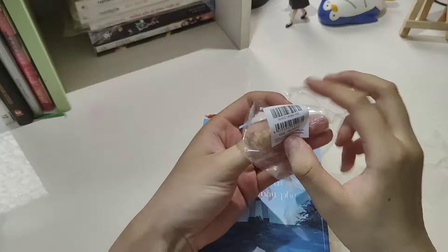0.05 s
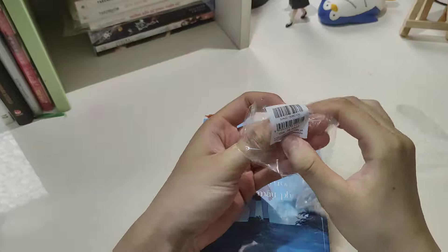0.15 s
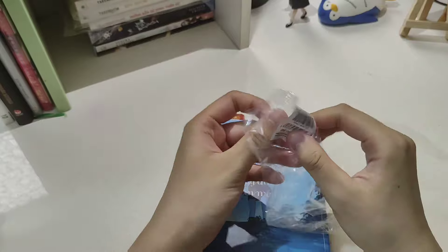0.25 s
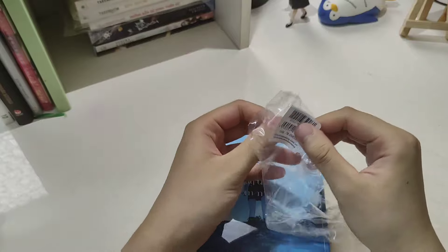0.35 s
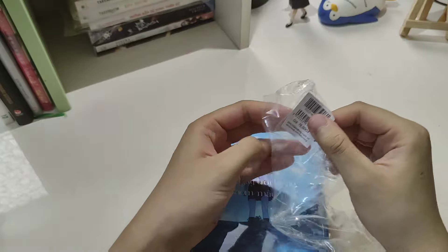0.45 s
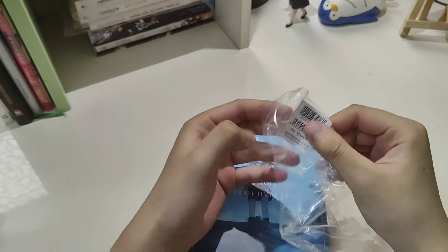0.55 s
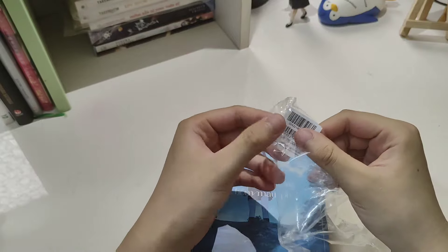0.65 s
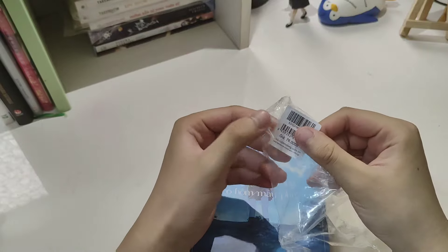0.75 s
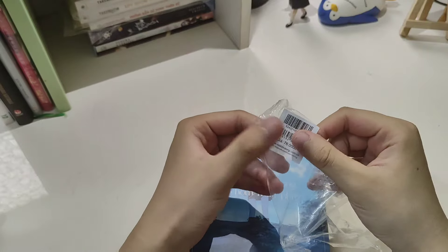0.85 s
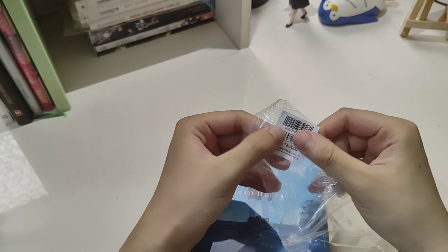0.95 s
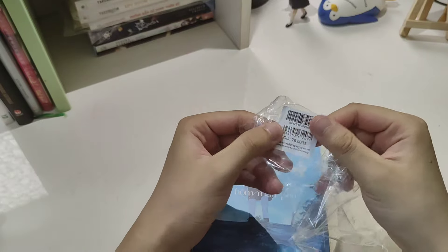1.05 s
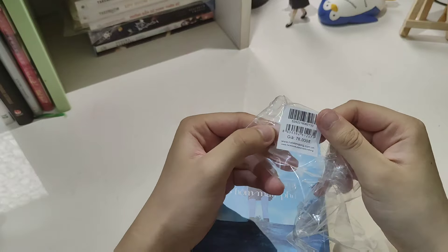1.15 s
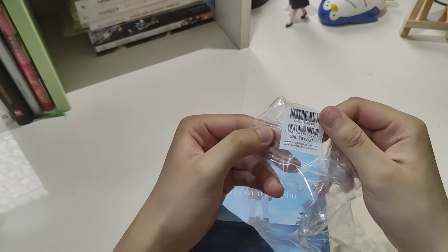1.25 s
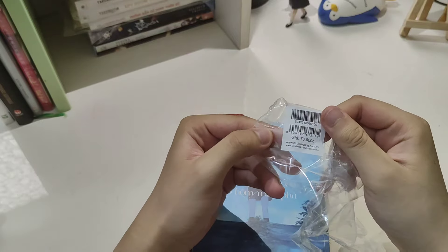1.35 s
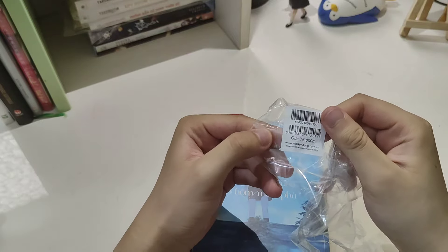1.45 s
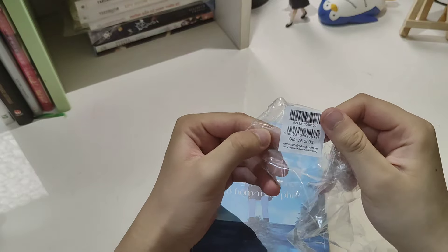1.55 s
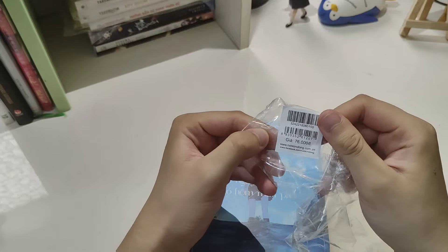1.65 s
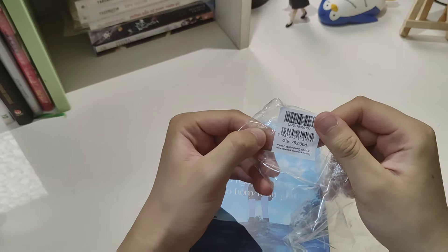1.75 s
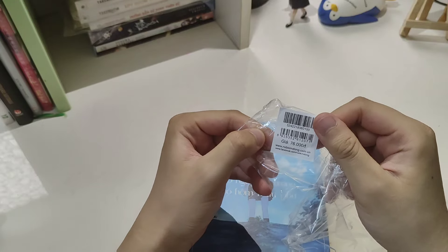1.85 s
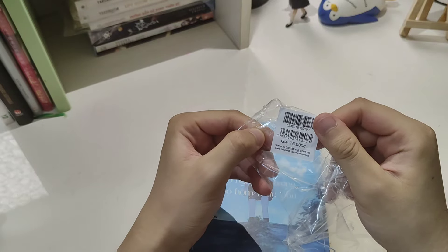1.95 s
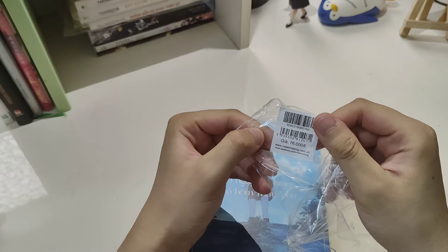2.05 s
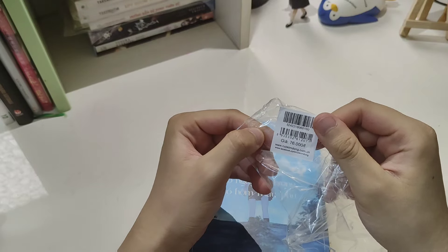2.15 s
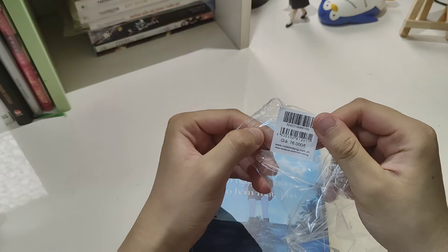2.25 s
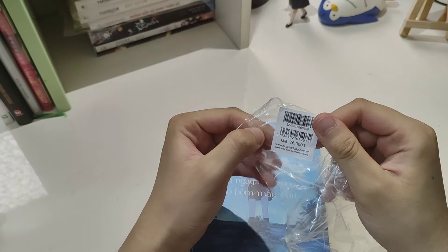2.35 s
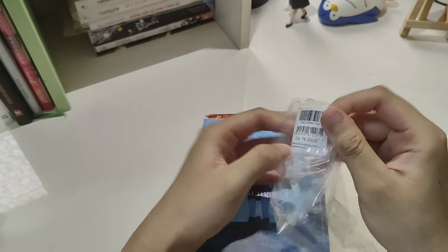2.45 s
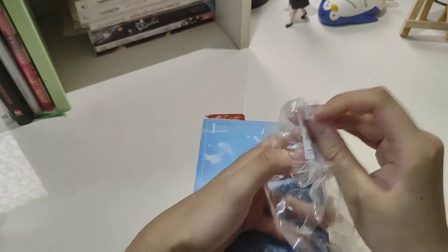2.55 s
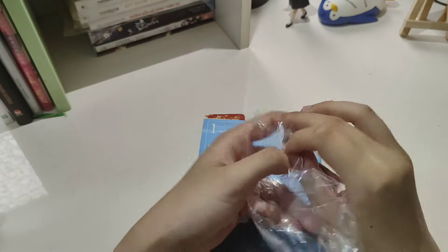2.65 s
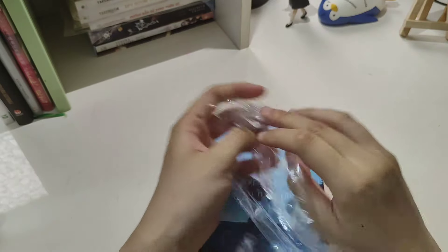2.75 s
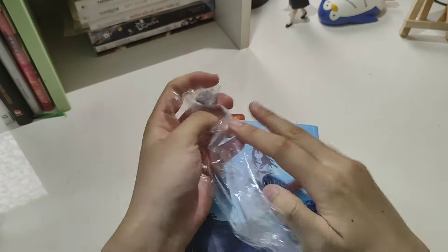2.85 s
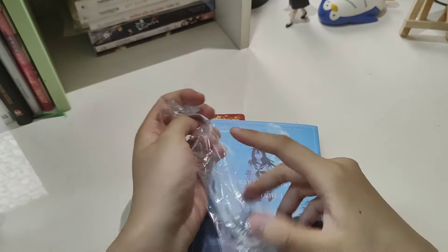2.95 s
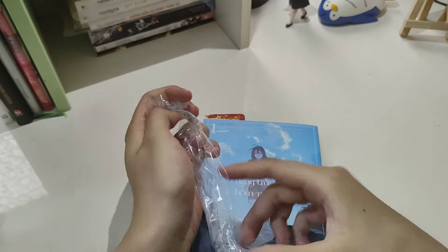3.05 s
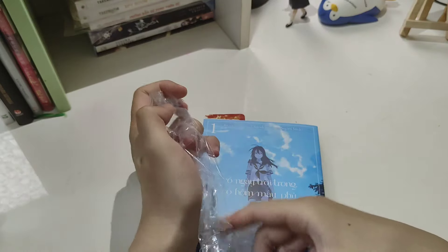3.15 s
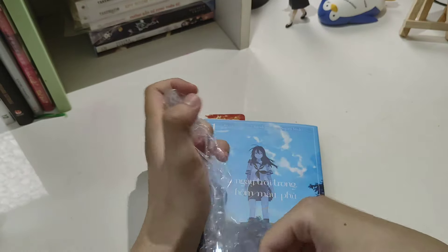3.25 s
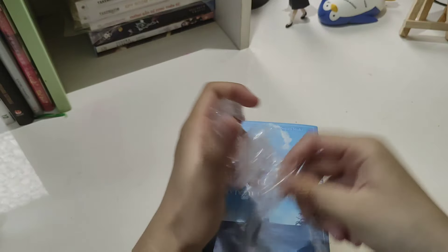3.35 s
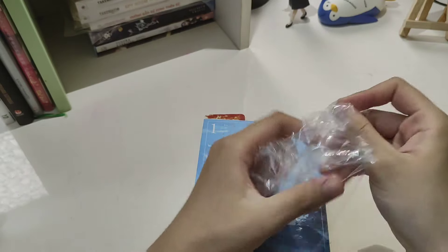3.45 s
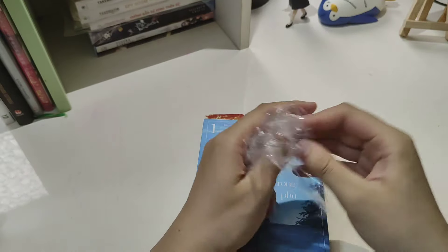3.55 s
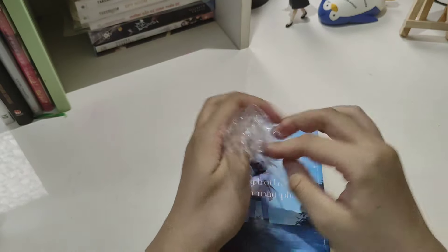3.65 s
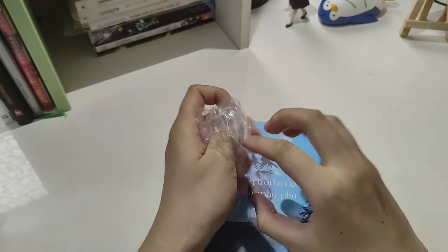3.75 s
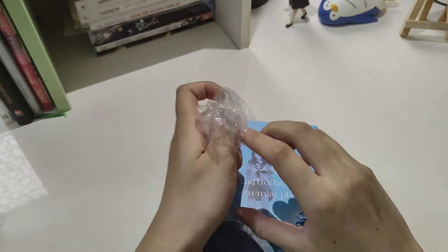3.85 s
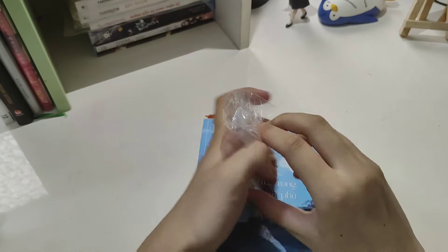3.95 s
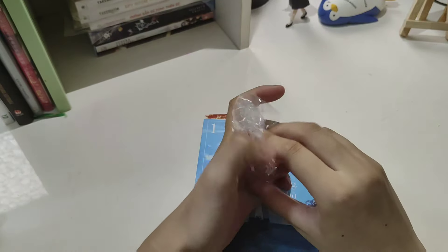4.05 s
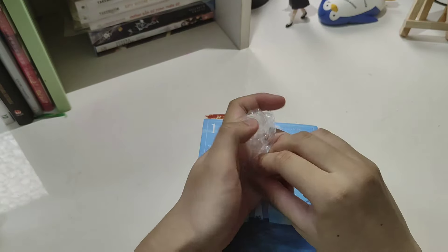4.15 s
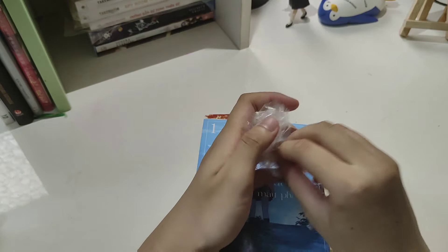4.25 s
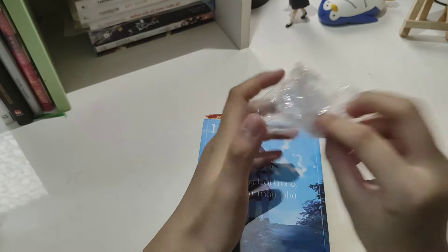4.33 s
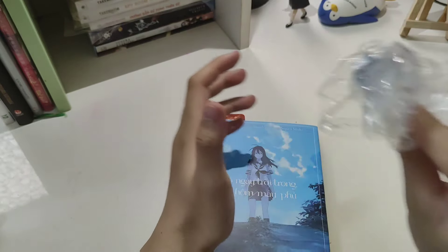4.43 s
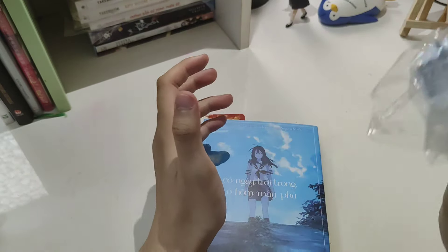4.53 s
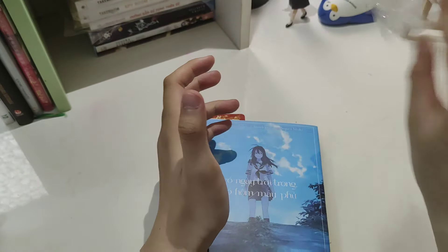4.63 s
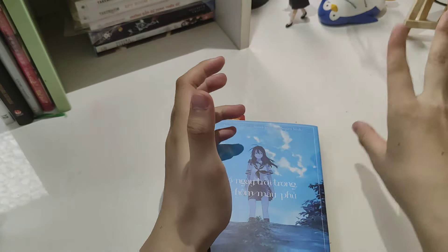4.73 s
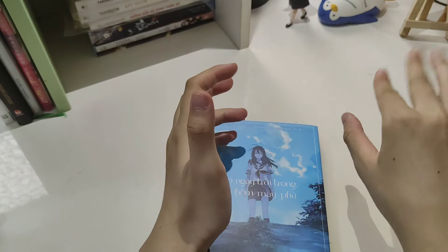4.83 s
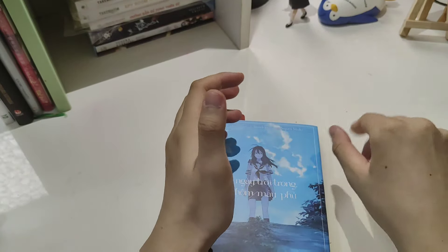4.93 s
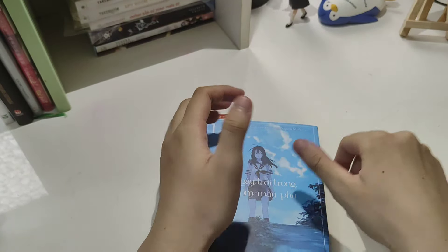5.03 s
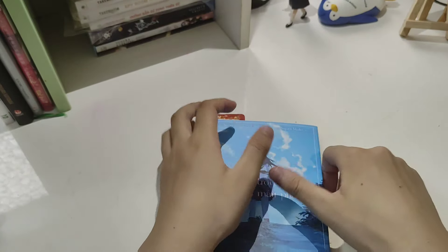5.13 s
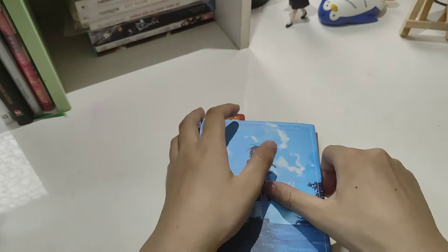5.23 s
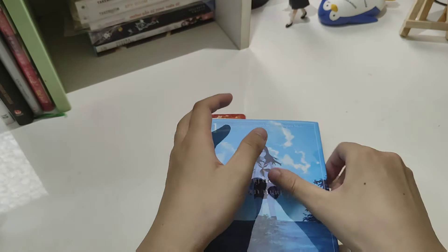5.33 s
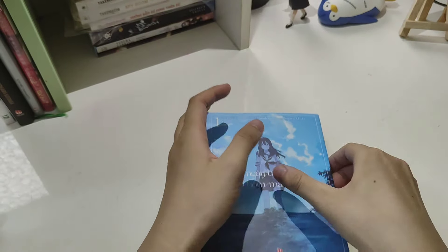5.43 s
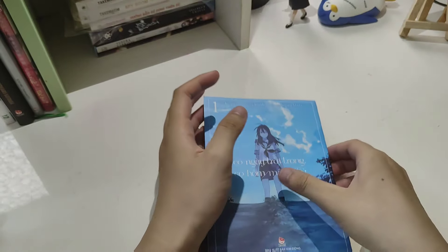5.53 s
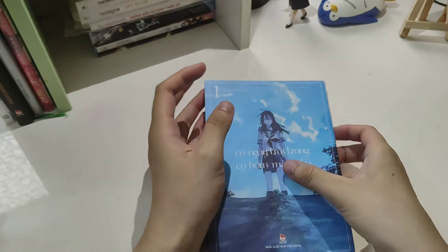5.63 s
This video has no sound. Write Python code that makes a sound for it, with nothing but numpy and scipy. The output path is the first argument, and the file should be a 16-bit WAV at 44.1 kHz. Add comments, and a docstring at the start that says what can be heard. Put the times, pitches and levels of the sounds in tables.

```python
"""At a desk in a quiet room, close to a small microphone: two hands pick at a sheet of clear plastic film,
crumple it into a ball and toss it aside. Its creases buckle in swarms of clicks that ring the film's modes,
and squeezed air pockets sound as puffs of noise in narrow resonances. Fingers settle on a book as slips that
ring its cover; a wrist bumps the desk as rounded pushes that ring its top.
Behind lie a low hum of resonant noise and room tone of coloured noise."""
import sys
import numpy as np
from scipy import signal
from scipy.fft import rfft, irfft
from scipy.io import wavfile

SR = 44100
rng = np.random.default_rng(int(sys.argv[2]) if len(sys.argv) > 2 else 0)


def to_linear_factor(level_db):
    """Convert decibel levels (scalar or array-like) to linear amplitude factors."""
    exponent = np.asarray(level_db, float) / 20
    return 10 ** exponent


def dump_mix(stems):
    """Bounce the given channels to the path in sys.argv[1] as a 16-bit WAV at rate SR."""
    frames = np.atleast_2d(stems).T  # one column per channel
    limited = np.clip(frames, -1, 1)  # hard clip at full scale
    pcm = np.round(limited * 32767).astype(np.int16)
    wavfile.write(sys.argv[1], SR, pcm)


N = 250929   # length [samples]

# single creases that snap, close by:
# start t/s, peak level/dB, favoured pitch f/Hz, bright sheen against the peak level/dB, dying time t60/s
SNAPS = [(0.0732, -21, 2807, -10.5, 0.06), (0.1047, -18, 2300, -16.5, 0.06), (0.1324, -23, 2420, -9, 0.06),
         (0.156, -21, 2430, -12, 0.06), (0.178, -27, 2384, -13, 0.069), (0.2409, -18, 2405, -21, 0.056),
         (0.2544, -29.5, 2585, -15.5, 0.06), (0.3287, -26, 4290, -8, 0.06),
         (0.3556, -26, 4260, -10.5, 0.06), (0.397, -21.5, 5030, -9, 0.06), (0.4259, -17, 4730, -10, 0.06),
         (0.4534, -23, 4340, -10, 0.06), (0.4864, -23, 4320, -13.5, 0.06), (0.5053, -19.5, 2650, -15, 0.06),
         (0.5646, -19, 4250, -8, 0.12), (0.6858, -46, 2900, -9, 0.06), (0.7134, -42, 2640, -11, 0.06),
         (0.7377, -37.5, 5630, -11.5, 0.06), (0.824, -53, 2710, -8, 0.06), (0.8734, -47, 2620, -16, 0.06),
         (0.8969, -37, 2730, -15.5, 0.081), (0.9453, -50.5, 2460, -5, 0.06),
         (0.9832, -35.5, 2570, -19.5, 0.076), (0.9957, -39.5, 2630, -24.5, 0.053),
         (1.0251, -47.5, 2610, -18, 0.052), (1.1313, -56.5, 2640, -21, 0.052),
         (1.2087, -30.5, 4850, -17.5, 0.13), (1.2364, -36.5, 4870, -13, 0.065),
         (1.2514, -41.5, 4570, -16.5, 0.069), (1.29, -40.5, 4460, -22.5, 0.11),
         (1.3294, -53, 2380, -17, 0.071), (1.4097, -50, 2660, -6, 0.048), (1.9036, -56, 5560, -8, 0.055),
         (1.93, -51, 5190, -7, 0.06), (2.6618, -26.5, 2670, -10, 0.06), (2.6798, -20, 2710, -13, 0.06),
         (2.7018, -10.5, 2850, -14.5, 0.06), (2.7686, -15.5, 2570, -8.5, 0.06),
         (2.7994, -15.5, 4890, -9.5, 0.06), (2.8285, -10.5, 2680, -12.5, 0.06),
         (2.8409, -12, 2610, -9.5, 0.06), (2.8629, -11, 3467, -12.5, 0.069),
         (2.9238, -12, 5090, -12, 0.052), (2.9334, -10, 2170, -10.5, 0.06),
         (2.9564, -14.5, 2450, -11, 0.06), (2.9851, -11, 2700, -11, 0.06), (3.0106, -10.5, 2760, -6, 0.06),
         (3.0404, -16.5, 5300, -7.5, 0.06), (3.0849, -22, 2780, -9, 0.06), (3.1234, -26.5, 2400, -18, 0.06),
         (3.1704, -25.5, 2820, -15.5, 0.06), (3.1807, -23.5, 2740, -15, 0.07),
         (3.2054, -20, 3480, -10.5, 0.065), (3.244, -19, 3150, -9, 0.06), (3.267, -21.5, 3200, -12, 0.071),
         (3.3069, -18.5, 2280, -14.5, 0.06), (3.3254, -26, 2350, -10, 0.06),
         (3.3418, -17.5, 2630, -8.5, 0.075), (3.3922, -13, 4420, -7.5, 0.06), (3.4451, -16, 4200, -8, 0.06),
         (3.4624, -20, 3090, -13, 0.06), (3.5344, -19.5, 2700, -11, 0.06), (3.5568, -22.5, 2690, -11, 0.06),
         (3.5884, -16.5, 2140, -11, 0.06), (3.6546, -16, 2690, -12.5, 0.06),
         (3.7274, -10, 2760, -13.5, 0.06), (3.7604, -9.5, 4910, -12.5, 0.06),
         (3.7844, -11.5, 2700, -14, 0.06), (3.8164, -11.5, 2720, -12, 0.06), (3.8274, -10, 4800, -15, 0.06),
         (3.8704, -13, 4350, -9.5, 0.06), (3.8944, -13, 2750, -9, 0.06), (3.9414, -12.5, 4780, -13.5, 0.06),
         (3.9978, -13.5, 4720, -11.5, 0.06), (4.0731, -12.5, 4740, -10, 0.06),
         (4.1044, -10.5, 2340, -13, 0.06), (4.1424, -11.5, 2340, -13, 0.06),
         (4.1999, -13, 2790, -15.5, 0.06), (4.2694, -23, 4840, -9.5, 0.06),
         (4.3036, -17.5, 2640, -11, 0.06), (4.3164, -14.5, 2640, -13, 0.06), (4.3544, -13, 5010, -13, 0.06),
         (4.4324, -14.5, 2675, -17, 0.06), (4.4493, -11.5, 2660, -15.5, 0.06),
         (4.5234, -13.5, 2470, -16, 0.063), (4.5604, -19, 2670, -13.5, 0.097),
         (4.6174, -40, 2650, -19, 0.06), (4.6962, -53.5, 5070, -12, 0.06),
         (4.7102, -48.5, 5000, -21.5, 0.06), (4.7304, -50, 5000, -17.5, 0.06),
         (4.8249, -41.5, 5150, -12, 0.06), (4.8389, -39, 5000, -10, 0.06), (4.8564, -30, 5260, -8, 0.078),
         (4.9254, -43, 4780, -9, 0.06), (4.9914, -55, 2660, -7, 0.06), (5.0804, -38.5, 4440, -13.5, 0.064),
         (5.1284, -55, 2600, -10, 0.06), (5.3532, -47, 1915, -12, 0.06)]
# ringing modes of the film, one list a voice (slack belly, low, middle, bright):
# f/Hz, t60 of one resonator pass t/s, relative level/dB
FILM_MODES = [
    [(450, 0.003, -0.5), (683, 0.011, -3), (854, 0.0075, 1.5), (1190, 0.014, 0.5), (1350, 0.0051, 1),
     (1810, 0.0061, -8)],
    [(1950, .006, -6.5), (2150, .006, -3.5), (2400, .007, -3), (2660, .008, 0), (2900, .007, -4),
     (3200, .006, -6), (3500, .005, -5)],
    [(3850, .005, -3.5), (4200, .005, -4), (4450, .007, -2), (4750, .006, -2), (5050, .007, 0),
     (5450, .005, -3)],
    [(5960, 0.0009, -3.5), (7170, 0.0016, -1), (8230, 0.0015, -4.5), (8980, 0.0017, -2.5),
     (9800, .0013, -1), (11170, .0013, 1.5), (12260, 0.0013, 2.5), (12400, 0.0029, -4.5),
     (13260, 0.0012, 8.5), (14100, 0.0024, 0.5)],
]


def film():
    """One stream of buckles drives all modes of the film, each with strengths of its own."""
    rustle_db = rustle_levels()
    busy = np.clip(to_linear_factor(rustle_db[3] + 65.5), .1, 1)   # barely moved film gives lone ticks
    buckles = clicks(2300 * busy, spread_db=2.6) * to_linear_factor(1.7 * drift(36)) / np.sqrt(busy)
    fine = clicks(9000, spread_db=2.0)
    shapes = swarm_shapes(rise_s=0.0018, sharp_share=0.96)
    return sum(film_voice(k, rustle_db[k], buckles, fine, shapes) for k in range(len(FILM_MODES)))


def film_voice(k, rustle_db, buckles, fine, shapes):
    """Buckles and cracks force the modes of voice k; a snap favours modes near its pitch."""
    start_s, _, pitch, _, _ = np.transpose(SNAPS)
    peak_at = ((start_s + .002) * SR).astype(int)   # the peak comes 2 ms after the start
    hz, t60, db = np.transpose(FILM_MODES[k])
    near = np.exp(-(np.log(hz[:, None] / pitch) / .065) ** 2)
    # the bright sheen stays broad and cracks softly
    focus, crack_db = [(1.0, 0.0), (2.5, 2.0), (2.5, 2.0), (0, -4.0)][k]
    snap_power = mode_shares(db[:, None] + 12 * near, snap_levels(k, hz), focus)
    snap_power = snap_power * (k > 0)   # the slack belly does not snap
    rustle_power = mode_shares(db[:, None], rustle_db - 3, 0.41 * focus)
    voice = np.zeros(N)
    for j in range(len(hz)):
        response = ring_twice(np.eye(1, 2000)[0], hz[j], t60[j])
        power = rustle_power[j] * to_linear_factor(3.52 * drift(11)) ** 2   # folds shift, modes come and go
        for i, snap, shape in zip(peak_at - 400, snap_power[j], shapes):
            power[i:i + len(shape)] += snap * shape
        force = rms_one(buckles * rng.standard_normal(N) + 1.15 * fine)
        force = force * np.sqrt(power / np.sum(response ** 2))
        crack = np.sqrt(snap_power[j]) * to_linear_factor(rng.normal(crack_db, 1, len(peak_at)))   # the crease itself
        force[peak_at - 50] += crack / np.max(response)
        voice += (-1) ** j * ring_twice(force, hz[j], t60[j])
    return cut(voice, 0.91 * hz[0], "high", order=4)   # little is radiated below the lowest mode


def gentleness():
    """0 for snaps of -22 dB or more, rising to 1 for those 14 dB weaker."""
    return np.clip((-22 - np.transpose(SNAPS)[1]) / 14, 0, 1)


def snap_levels(k, hz):
    """Level of voice k in each snap: the sheen has its own, the others fade with distance from the pitch."""
    _, db, pitch, sheen_db, _ = np.transpose(SNAPS)
    if k == 3:
        return db + sheen_db + 2 - 2.5 * gentleness()   # weak snaps are duller
    octaves_off = np.abs(np.log2(pitch / np.clip(pitch, hz[0], hz[-1])))
    off_pitch_db = 12 * octaves_off * (1 + 1.2 * gentleness())   # weak snaps keep closer to their pitch
    crest_db = 8.5   # the peak over the ringing
    return db - crest_db - 0.85 * (sheen_db + 20) - off_pitch_db   # a brighter snap rings less


def swarm_shapes(rise_s, sharp_share):
    """Each snap is a swarm of buckles: a quick swell, a sharp peak and a thinning tail (power in time)."""
    t = np.arange(-400, 8000) / SR
    t60 = np.transpose(SNAPS)[4][:, None]
    sharp = np.clip(sharp_share - .3 * gentleness()[:, None], 0, 1)   # weak snaps crack less sharply
    after = sharp * to_linear_factor(-60 * t / 0.004) ** 2 + (1 - sharp) * to_linear_factor(-60 * t / t60) ** 2
    return np.where(t < 0, np.exp(np.minimum(t, 0) / rise_s), after)


def mode_shares(mode_db, voice_db, focus):
    """Power of each mode: with focus, gently handled film sounds almost only in its strongest modes."""
    gentle = np.clip((-39 - voice_db) / 12, 0, 1)
    share = to_linear_factor(mode_db * (0.5 + focus * gentle)) ** 2
    return share / share.sum(axis=0) * to_linear_factor(voice_db) ** 2


# squeezes of the hands: greatest force t/s, rustle level/dB, swell by 20 dB t/s, fade by 20 dB t/s
# (both before the linger factor, sign without effect), slackness of the film level/dB
SQUEEZES = [(.025, -34.5, 0, 0.14, 4), (.11, -32.5, 0.14, 0.0444, 1), (.19, -47, -0.6, 0.1858, 5.5),
            (.335, -46, -0.15, -0.0053, -6.5), (.43, -32.5, 0.12, .09, -8), (.51, -36.5, 0.11, 0.08, 1.5),
            (.58, -40.5, .08, 0.0626, 0), (.72, -69, 0.6, 0.07, 3), (.9, -63, 0.33, 0.14, 12),
            (1.0, -70, 0.5, 0.15, 3), (1.22, -49.5, 0.03, 0.04, -2), (1.3, -66, 0.1, .09, 8),
            (1.415, -65.5, -0.14, 0, -9), (1.93, -66, .05, 0.07, -10.5), (2.715, -26, 0.0685, 0.06, -2),
            (2.78, -30, 0.0345, 0.08, -8), (2.857, -24.5, 0.0664, 0.0448, 0.5),
            (2.935, -23.5, 0.0567, 0.0731, 3), (3.01, -26, 0.0655, 0.1039, 4.5),
            (3.11, -35.5, 0.1046, 0.11, 0), (3.19, -39.5, 0.054, .06, -11),
            (3.25, -31.5, 0.0538, 0.05, -9.5), (3.29, -38, 0.0435, 0.02, -7),
            (3.33, -29.5, 0.0285, 0.04, -7), (3.4, -30, 0.0416, 0.0243, -4), (3.462, -33, 0.0462, 0.06, 3),
            (3.57, -33, 0.0853, 0.1038, 6.5), (3.662, -29, 0.0768, .07, -1), (3.758, -21, 0.067, 0.118, 0),
            (3.85, -23, .1, 0.0949, -0.5), (3.945, -23.5, 0.0629, 0.0648, 0.5),
            (4.009, -25.5, 0.023, 0.0819, -6.5), (4.102, -22.5, .09, 0.0863, -7),
            (4.15, -24.5, 0.0645, 0.0368, -3.5), (4.21, -25, 0.0631, 0.0581, -8),
            (4.27, -37, -0.04, 0.0224, -6.5), (4.33, -28, 0.0664, 0.1168, -11),
            (4.44, -29, 0.1657, .1, -10.5), (4.54, -29.5, 0.184, 0.0718, -7), (4.66, -66, 0.4, 0.13, -8),
            (4.81, -66, -0.1, 0.1, -5), (4.86, -42.5, 0.02, 0.0458, -12), (4.93, -63, .06, 0.1, -3),
            (5.09, -57.5, 0.08, 0.03, -2), (5.36, -66, 0.06, .03, -4.5), (5.5, -77, 0.9, 0.6, -3)]
# one entry a voice (slack belly, low, middle, bright): level against the rustle level/dB
VOICE_DB = [-23, -8.5, -8.5, 0]
# one entry a voice: share of the slackness it gains [dB per dB]
SLACK_SHARE = [1.1, 0.3, 0.0097, 0.032]
# one entry a voice: how far it moves with the rustle, about a firm squeeze [dB per dB]
FOLLOW = [0.83, 1.124, 1.1, 1.036]
# one entry a voice: factor on swell and fade; the low voice enters before the sheen and outlasts it
LINGER = [.95, 1.317, 1.07, 1.0]


def rustle_levels():
    """Squeezes add up in power; each voice follows them, the lower ones more where the film is slack (dB)."""
    firm_db, rest_db = -30, -89   # the film is never quite still
    t = np.arange(0, N, 64)[:, None] / SR
    s, db, swell, fade, slack_db = np.transpose(SQUEEZES)
    shape_db = -20 * ((t - s) / np.where(t < s, swell, fade)) ** 2
    levels = []
    for voice_db, share, follow, linger in zip(VOICE_DB, SLACK_SHARE, FOLLOW, LINGER):
        squeeze_db = firm_db + follow * (db - firm_db) + share * slack_db + shape_db / linger ** 2
        power = to_linear_factor(rest_db) ** 2 + np.sum(to_linear_factor(squeeze_db) ** 2, axis=1)
        levels.append(np.interp(np.arange(N) / SR, t[:, 0], voice_db + 10 * np.log10(power)))
    return levels


# air pockets between the folds, squeezed close by: middle t/s, f/Hz, level before fading in and out/dB
POCKETS = [(.013, 871, -57), (.019, 1419, -51.5), (.084, 459, -57), (.122, 808, -58), (.023, 1172, -56.5),
           (.11, 1395, -47.5), (.4, 654, -54), (.625, 820, -66), (2.728, 1183, -54), (2.854, 1177, -48.5),
           (2.862, 705, -48), (2.949, 1330, -50.5), (2.991, 736, -48.5), (3.014, 447, -51.5),
           (3.016, 1130, -52), (3.32, 605, -61.5), (3.355, 1207, -50.5), (3.468, 1160, -50.5),
           (3.576, 818, -53.5), (3.587, 1185, -50), (3.644, 1263, -49), (3.74, 660, -55.5),
           (3.765, 1579, -51.5), (3.801, 748, -51), (3.804, 1323, -51.5), (3.84, 880, -45),
           (3.888, 410, -58.5), (3.958, 896, -48.5), (3.959, 1197, -49), (4.113, 1456, -50.5),
           (4.138, 1155, -53), (4.212, 792, -51), (4.353, 1419, -55.5), (4.554, 854, -53.5),
           (5.101, 665, -63.5)]


def pockets():
    """A puff of air excites a narrow cavity resonance for a moment."""
    out = np.zeros(N)
    size = int(2 * .058 * SR)   # twice 58 ms
    for s, hz, db in POCKETS:
        puff = rng.standard_normal(12000)
        tone = rms_one(ring_twice(puff, hz, 0.027))[:size] * np.hanning(size) * to_linear_factor(db)
        start = int(s * SR) - size // 2
        out[max(start, 0):start + size] += tone[max(-start, 0):]
    return out


# resonances of the book cover, close by: f/Hz, width f/Hz, relative level/dB
COVER = [(243.5, 9.6, -1.5), (446, 24, 4), (665, 35, 1.5), (900, 35, -5), (1166, 51, -4), (1890, 70, -14),
         (2790, 52, -24), (4480, 140, -20), (6300, 200, -26)]


def book():
    """Skin slips over the cover in small catches that ring its resonances."""
    slips = clicks(590, spread_db=4.5)
    body = np.zeros(N)
    for hz, width, db in COVER:
        t60 = np.log(1000) / (np.pi * width)
        body += to_linear_factor(db) * rms_one(ring(slips * rng.standard_normal(N), hz, t60))
    start_s, catch_s, end_s = 5.325, 5.364, 5.41
    t = np.arange(N) / SR
    lift = np.exp(-np.maximum(t - end_s, 0) / 0.011)
    drag = to_linear_factor(-53.5) * np.clip((t - start_s) / 0.0059, 0, 1) * lift
    catch = to_linear_factor(-35.5) * np.exp(-np.abs(t - catch_s) / 0.0058)
    return rms_one(body) * (drag + catch)


# bumps of the wrist on the desk top: t/s, push level/dB, contact t/s
BUMPS = [(.54, -48, .006), (1.599, -57.5, 0.0036), (1.79, -50, .006), (2.46, -47, .006),
         (3.517, -37.5, .002), (3.527, -19.5, .002), (3.546, -31.5, .002), (3.571, -27, .002),
         (3.66, -37.5, .003), (3.97, -55, .003), (5.06, -54, 0.0028), (5.16, -46, 0.0062),
         (5.19, -51, .005), (5.215, -42.5, .005)]
# modes of the desk top: f/Hz, relative level/dB, t60 t/s
DESK_MODES = [(93, -8.5, .2), (140, -1.5, .26), (189.4, -3, 0.18), (246, -9, 0.072), (322.7, -12, 0.15),
              (375.4, -16.5, 0.42)]


def desk():
    """Soft bumps, each a rounded push, ring the modes of the desk top; its deepest part is thinned."""
    push = np.zeros(N)
    for s, db, contact in BUMPS:
        shape = np.hanning(int(contact * SR) + 2)
        start = int(s * SR)
        push[start:start + len(shape)] -= to_linear_factor(db) * shape / shape.sum()
    ringing = sum(to_linear_factor(db) * ring(push, hz, t60) for hz, db, t60 in DESK_MODES)
    return cut(ringing, 99, "high", order=2)


def reflections(x, t60, wet_db):
    """Desk, shelf and walls send back a short diffuse tail."""
    t = np.arange(int(.3 * SR)) / SR
    tail = rng.standard_normal(len(t)) * to_linear_factor(-60 * t / t60) * (t > .002)
    tail = tail / np.sqrt(np.sum(tail ** 2))
    return x + to_linear_factor(wet_db) * signal.fftconvolve(x, tail)[:N]


# swells of the hum in the background: middle t/s, gain level/dB, Gaussian width t/s
SWELLS = [(.02, -48, 0.075), (.55, -60, .25), (.98, -64.5, .06), (2.6, -59, 0.073), (3.32, -57, 0.11),
          (5.44, -67, 0.078)]


def hum():
    """Noise twice through one low resonance, its chance swings partly evened."""
    hz, width_hz = 46.4, 31   # width of one pass
    tone = rms_one(ring_twice(rng.standard_normal(N), hz, np.log(1000) / (np.pi * width_hz)))
    even = rms_one(tone / (.3 + np.abs(signal.hilbert(tone))) ** .7)
    t = np.arange(N) / SR
    swells = sum(to_linear_factor(db) * np.exp(-((t - s) / width) ** 2) for s, db, width in SWELLS)
    return even * (to_linear_factor(-64 + 1.5 * drift(3)) + swells)   # steady part wavers by 1.5 dB


# colour of the room in the background: f/Hz, relative level per Hz/dB
ROOM_TONE = [(41, -43), (70, -8), (131, -5), (154, -21), (172, -8.5), (192, -9.5), (282, -19), (301, -19.5),
             (441, -16), (565, -31.5), (757, -18.5), (1300, -32.5), (1550, -29), (3480, -39),
             (15000, -49.5)]


def room_tone():
    """Noise with the colour of the room, wavering slowly."""
    hz = np.maximum(np.arange(N // 2 + 1) * SR / N, 1)
    at, db = np.transpose(ROOM_TONE)
    colour = to_linear_factor(np.interp(np.log(hz), np.log(at), db))
    noise = rms_one(irfft(rfft(rng.standard_normal(N)) * colour, N))
    return to_linear_factor(-68.5) * noise * to_linear_factor(1.0 * drift(2.2))


def rms_one(x):
    """Scale to unit power."""
    return x / np.sqrt(np.mean(x ** 2) + 1e-20)


def drift(rate):
    """Slow random wander of spread 1: noise through two equal low-pass poles at rate (Hz)."""
    r = np.exp(-2 * np.pi * 20 * rate / SR)   # computed at every 20th sample
    noise = rng.standard_normal(N // 20 + 3002)
    slow = signal.lfilter([1], [1, -2 * r, r * r], noise)[3000:]   # past the settling
    return np.interp(np.arange(N) / 20, np.arange(len(slow)), rms_one(slow))


def ring(x, hz, t60):
    """A two-pole resonator: a unit click sets a dying sine of height 1 ringing."""
    r, w = to_linear_factor(-60 / (t60 * SR)), 2 * np.pi * hz / SR
    return signal.lfilter([0, np.sin(w)], [1, -2 * r * np.cos(w), r * r], x + 1e-18)


def ring_twice(x, hz, t60):
    """The same resonator passed twice, for steep skirts."""
    return ring(ring(x, hz, t60), hz, t60)


def clicks(per_s, spread_db):
    """Random clicks of unit power, many small and few large."""
    sizes = to_linear_factor(spread_db * np.minimum(rng.exponential(1, N), 4)) * rng.choice([-1, 1], N)
    return rms_one(sizes * (rng.random(N) < per_s / SR))


def cut(x, hz, kind, order):
    """Butterworth high-, low- or band-pass."""
    return signal.sosfilt(signal.butter(order, hz, kind, fs=SR, output="sos"), x)


def scene():
    """Film, book and desk close by, the room behind."""
    near = reflections(film() + pockets() + book(), t60=0.07, wet_db=-11.5)
    return (near + desk() + hum() + room_tone())[None]


def roll_off(x):
    """The treble ends steeply here."""
    return signal.sosfilt(signal.butter(12, 15600, fs=SR, output="sos"), x)


def record(dry):
    """Small microphone: no deep bass, the top cut steeply."""
    no_bass = cut(dry, 38, "high", order=6)
    steep = signal.cheby2(14, 60, 14640, fs=SR, output="sos")   # 60 dB down from 14640 Hz
    mix = signal.sosfilt(steep, no_bass)
    return roll_off(mix)


dry = scene()
out = record(dry)
dump_mix(out)
```